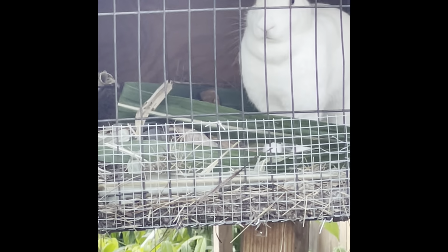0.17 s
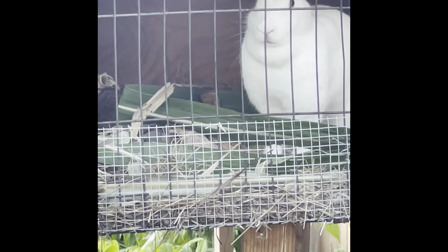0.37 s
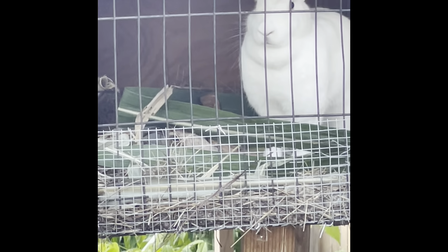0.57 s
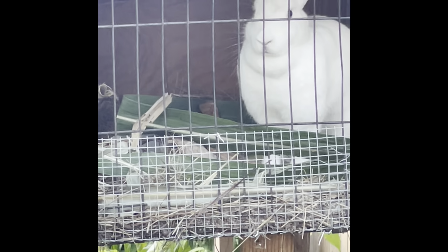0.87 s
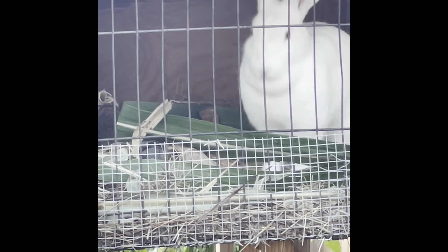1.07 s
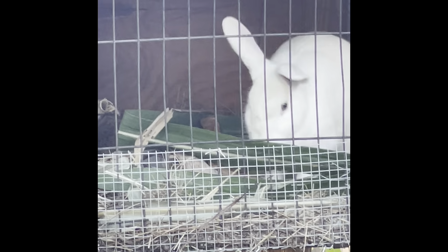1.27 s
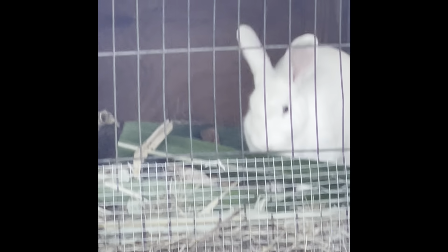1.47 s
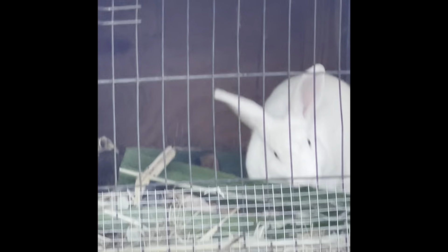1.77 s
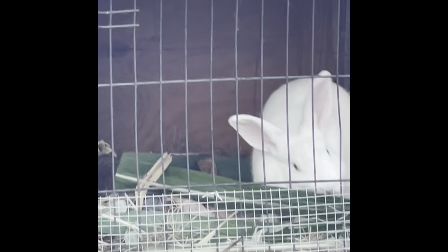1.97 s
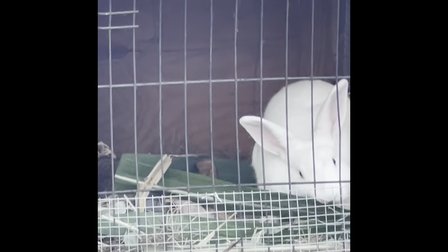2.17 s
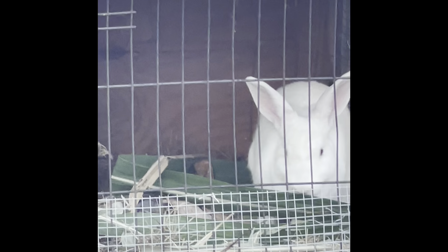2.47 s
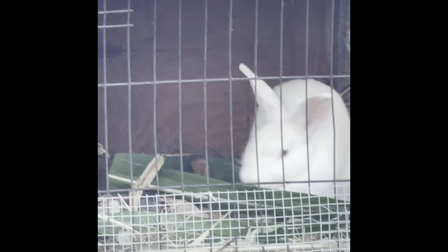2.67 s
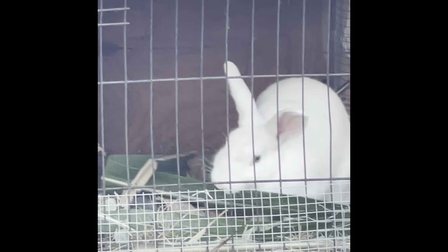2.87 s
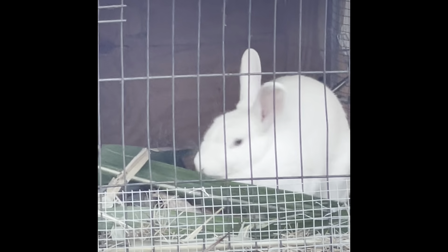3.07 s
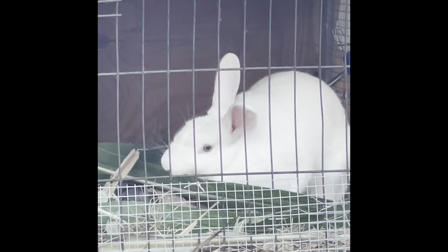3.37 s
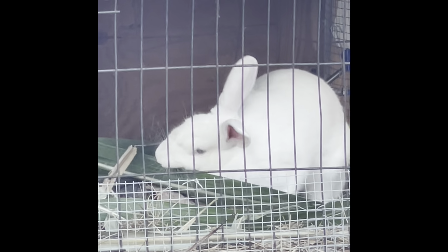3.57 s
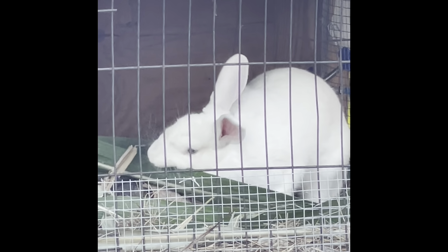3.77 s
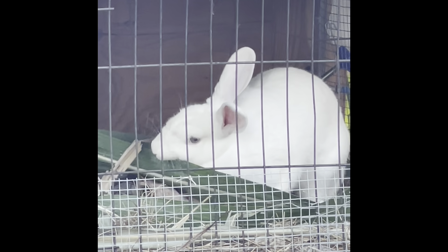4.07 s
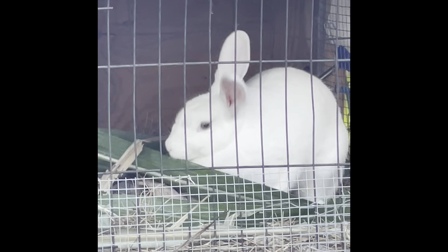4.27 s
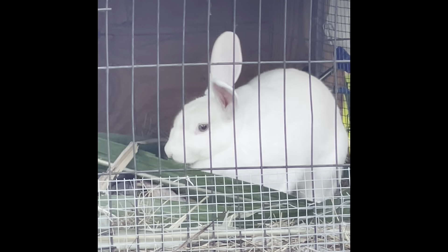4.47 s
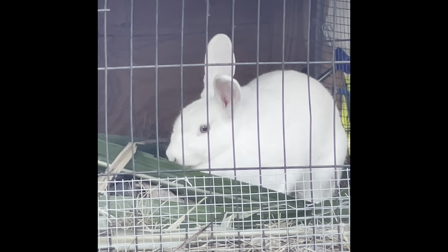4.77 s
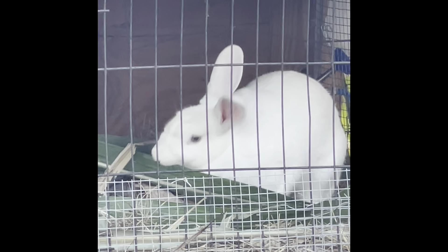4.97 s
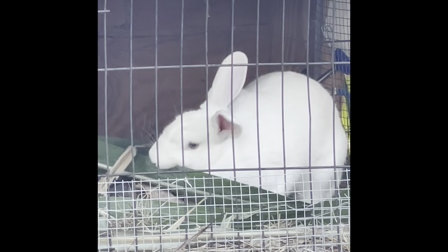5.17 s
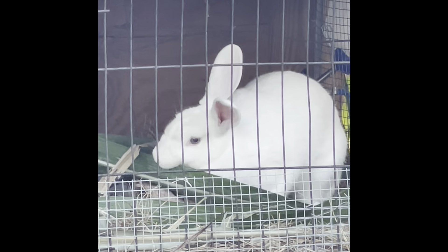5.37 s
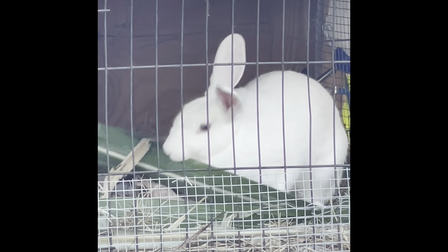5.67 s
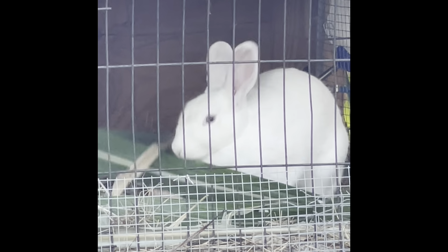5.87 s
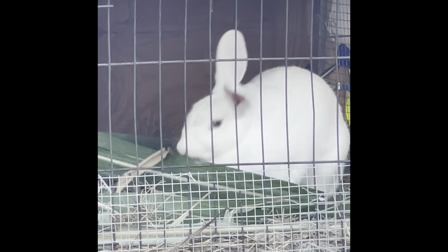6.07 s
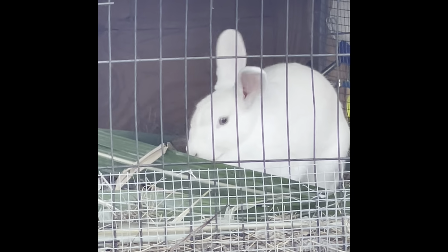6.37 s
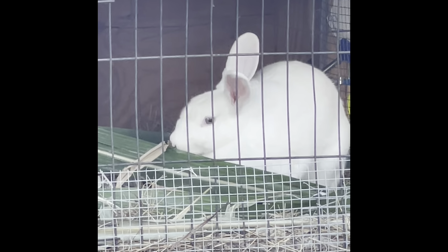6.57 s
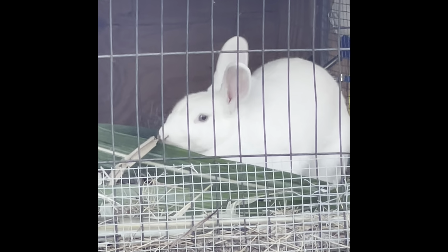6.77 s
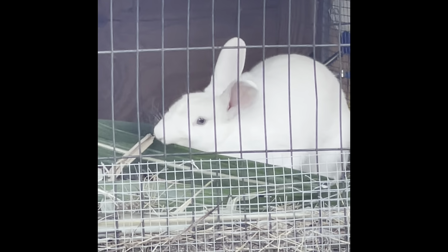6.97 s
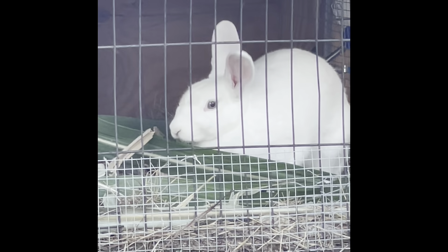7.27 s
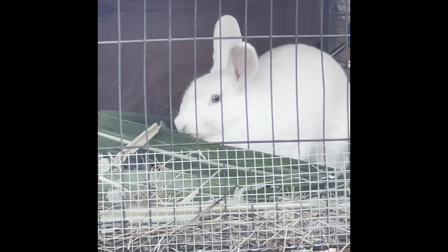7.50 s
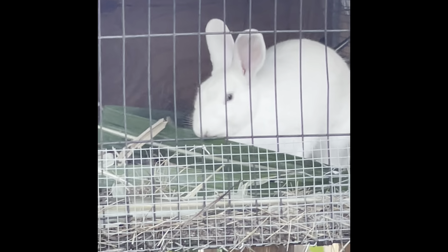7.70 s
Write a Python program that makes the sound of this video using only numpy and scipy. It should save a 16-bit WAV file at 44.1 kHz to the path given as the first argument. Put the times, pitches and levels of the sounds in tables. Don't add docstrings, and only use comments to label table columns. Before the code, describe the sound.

A nearby jay gives four harsh, rasping screams outdoors over low distant traffic rumble and faint insect hiss, with small ticks of straw and wire.

```python
import sys
import numpy as np
from scipy import signal
from scipy.fft import rfft, irfft, next_fast_len
from scipy.io import wavfile
from scipy.ndimage import map_coordinates

SR = 44100
rng = np.random.default_rng(int(sys.argv[2]) if len(sys.argv) > 2 else 0)


def to_linear_factor(level_db):
    exponent = np.asarray(level_db, float) / 20
    return 10 ** exponent


def waveform_to_disk(signal):
    frames = np.transpose(np.atleast_2d(signal))
    scaled = np.clip(frames, -1, 1) * 32767
    samples = np.round(scaled).astype(np.int16)
    wavfile.write(sys.argv[1], SR, samples)


N = 376525

# time in seconds, traffic density in dB.
TRAFFIC_DENSITY = [
    (0.0, -60),
    (0.45, -61),
    (1.76, -63),
    (2.26, -62.5),
    (2.54, -62.5),
    (4.02, -64),
    (4.66, -63),
    (6.06, -65),
    (8.54, -65),
]
# mean level in dB, share of the density swing, gusts in dB.
ROAD_LAYERS = [
    (-40, 0.1, 0.55),
    (-49, 0.52, 0.66),
    (-62, 0.91, 0.56),
]
# frequency in Hz, level in dB.
RUMBLE_COLOUR = [(12, -86), (25, -40), (33, -17), (39, 8), (48, -1), (70, 2), (113, -1.5), (145, 1.5),
                 (171, -6.5), (198, -3), (222, -8.5), (344, -17), (520, -45), (900, -120)]
ROAR_COLOUR = [(90, -90), (150, -29), (300, 1.5), (600, 1), (900, -2.5), (1200, -10.5), (1700, -73),
               (2600, -110)]
TYRE_HISS_COLOUR = [(400, -91), (700, -24), (1200, 0), (1700, -7.5), (2200, -15.5), (3000, -22.5),
                    (3500, -31), (6000, -33.5), (9500, -31), (11300, -27), (12000, -29), (13200, -40),
                    (14400, -49)]

# peak in Hz, fall below it in Hz per 10 dB, fall above it in Hz per 10 dB.
INSECT_BANDS = [
    (5170, 252, 168),
    (6707, 344, 148),
    (8583, 608, 255),
]
# time in seconds, level in dB.
LOW_CHORUS = [(0.0, -89), (0.45, -85), (0.83, -99), (1.09, -101), (1.21, -78), (1.95, -95), (2.64, -81),
              (3.14, -95), (3.3, -81.5), (4.35, -95), (4.9, -85), (6.01, -88), (6.25, -91), (7.99, -90),
              (8.08, -79), (8.54, -86)]

# start in seconds, length in seconds, start pitch in Hz, end pitch in Hz, level in dB.
CHIPS = [(1.94, 0.055, 4120, 4070, -74), (2.19, 0.064, 4100, 4080, -75), (4.082, 0.032, 3950, 3800, -77),
         (4.255, .06, 4400, 4400, -82), (4.496, .04, 4500, 4450, -81), (6.89, .07, 3500, 3460, -84),
         (6.96, .03, 4100, 3940, -79), (7.028, 0.046, 3930, 3950, -80), (7.17, .09, 4500, 4500, -82),
         (7.413, 0.055, 4500, 4340, -80)]

# start in seconds, length in seconds, first pitch in Hz, last pitch in Hz, level in dB.
FAR_ANSWERS = [
    (2.03, .33, 859, 780, -80),
    (7.622, .25, 839, 800, -77.5),
]
# overtone number, level in dB.
FAR_OVERTONES = [(3, 2.5), (4, 5), (5, -12), (6, -16), (7, -8), (8, -21)]

# start in seconds, peak in dB, decay t60 in seconds, body over crisp part in dB.
WIRE_TICKS = [(1.73, -50, 0.12, -16), (2.66, -72, .055, -6), (2.76, -68, .06, 10), (3.75, -66, 0.045, -4),
              (3.818, -55.5, 0.075, 4), (3.86, -63, .06, 4), (3.934, -51.5, 0.11, 0.5),
              (4.29, -68, .05, -8), (5.755, -59, 0.057, 1), (6.02, -73, .05, -8), (6.55, -63, .05, -8),
              (6.846, -63, .05, -7), (7.159, -55, .05, -15), (8.315, -68.5, 0.19, 14), (8.35, -60, 0.14, 2),
              (8.401, -61, 0.12, 5), (8.459, -55, .22, 7), (8.509, -53, 0.18, -10)]
# start in seconds, peak in dB, rise in seconds, body over crisp part in dB.
STRAW_BRUSHES = [
    (2.872, -58.5, 0.012, 2),
    (4.46, -72, .02, 3),
    (5.62, -64.5, .01, 9),
    (5.68, -61.5, .0097, 7.5),
    (5.86, -64, 0.0082, 9),
    (8.175, -48, 0.032, 1),
    (8.24, -76, 0.056, 6),
    (8.499, -54.5, 0.006, 8),
]
# frequency in Hz, level in dB.
CRISP_COLOUR = [(2500, -40), (5000, -1), (7500, 0.5), (10500, 4.5), (12000, 1), (13500, -36), (15000, -50)]
BODY_COLOUR = [(500, -36), (1200, 9.5), (2500, 6.5), (4500, 0), (7000, -9), (10000, -42)]

# delay in seconds, strongest frequency in Hz, width in Hz, level in dB.
HEDGE_ECHO = (.12, 2950, 900, -15)
# frequency in Hz, t60 in seconds.
GARDEN_DECAY = [(1000, .4), (2000, 0.75), (3000, 0.77), (4500, 0.66), (7000, 0.47), (12000, 0.14)]

# clear note's start in seconds, its length in seconds, top pitch in Hz, level in dB,
# hoarseness from 0 to 1.
SCREAMS = [
    (1.089, 0.15, 1039, -52, 0.54),
    (3.16, 0.11, 1020, -53, 0.43),
    (5.263, .14, 1028, -52, .3),
    (7.954, 0.12, 982, -55.5, 0.44),
]
# stage, pitch in Hz, effort in dB, brightness in dB per octave.
SCREAM_ARCH = [
    (.3, 848, -3, -2),
    (.75, 864.4, 0.5, -18),
    (1, 983, -1.5, -1),
    (1.2, 1023, -5, 2.5),
    (1.58, 1006, -0.5, 1),
    (2, 976, -7.5, 8.5),
    (2.2, 867, -6, 6),
    (2.55, 743, -4.5, 0),
    (3, 714, -13.5, 0),
]
BILL_OPENING = [
    (0, 1),
    (.78, .9),
    (1.05, 0),
    (1.95, 0),
    (2.12, 1),
    (3, 1),
]
# overtone number, level in dB.
NEAR_OVERTONES = [(1, -24), (2, 3.5), (3, -1), (4, -4), (5, -8.5), (6, -9.5), (7, -12.5), (8, -20),
                  (9, -20), (10, -29.5), (11, -28), (12, -33)]
# frequency in Hz, level in dB.
THROAT_COLOUR = [(1200, -50), (2000, -40), (3000, 2), (3700, -22), (4300, 0.5), (5200, -6.5), (6500, -4),
                 (8000, -10), (11000, -19), (12500, -52)]

# frequency in Hz, left-right likeness from 0 to 1.
CHANNEL_LIKENESS = [(25, 0.98), (60, 1), (300, .99), (500, 0.95), (800, 0.55), (1150, 0.14), (1450, 0.77),
                    (1700, 0.99), (2000, 0.94), (9000, 0.99), (10500, 1), (12200, 0.77), (13700, .99),
                    (14300, .9)]
# frequency in Hz, radians by which the left channel leads.
CHANNEL_LEAD = [(300, 0), (800, .65), (1050, 0), (1300, -1), (1750, 0), (2700, .74), (4000, .8), (4550, 1.6),
                (5300, 5.4), (5750, 6.27), (6150, 6.42), (8850, 9.35), (9700, 9.7), (12000, 12.56)]


def unit(x):
    return x / np.sqrt(np.mean(x ** 2) + 1e-20)


def along(points, hz):
    f, v = np.transpose(points)
    return np.interp(np.log(hz + 1), np.log(f + 1), v)


def over_time(rows):
    return np.interp(np.arange(N) / SR, *np.transpose(rows))


def wobble(rate, size=N):
    knots = rng.standard_normal(int(size * rate / SR) + 4)
    return map_coordinates(knots, [np.arange(size) * rate / SR])


def filtered(x, response):
    m = next_fast_len(N + 8192)
    return irfft(rfft(x, m) * response(np.fft.rfftfreq(m, 1 / SR)), m)[..., :N]


def noise(gain, channels=1):
    return unit(filtered(rng.standard_normal((channels, N)), gain))


def coloured_noise(points, channels=1):
    return noise(lambda hz: to_linear_factor(along(points, hz)), channels)


def traffic():
    density_db = over_time(TRAFFIC_DENSITY)
    swing_db = density_db - density_db.mean()
    road = np.zeros((2, N))
    for (db, share, gust_db), colour in zip(ROAD_LAYERS, (RUMBLE_COLOUR, ROAR_COLOUR, TYRE_HISS_COLOUR)):
        level_db = db + share * swing_db + gust_db * wobble(5)
        road += to_linear_factor(level_db) * coloured_noise(colour, channels=2)
    return road


def insects():
    out = np.zeros(N)
    levels = [over_time(LOW_CHORUS) + 7]
    levels += [db + 2.1 * wobble(1.35) for db in (-76, -70.5)]
    warm_up_s = 1.8
    levels[-1] += -2 * np.exp(-(np.arange(N) / SR / warm_up_s) ** 2)
    for (peak_hz, below_hz, above_hz), db in zip(INSECT_BANDS, levels):
        def band(hz):
            away = np.where(hz < peak_hz, (peak_hz - hz) / below_hz, (hz - peak_hz) / above_hz)
            return to_linear_factor(-10 * np.abs(away) ** 1.8)
        out += to_linear_factor(db + 1.83 * wobble(7.4)) * noise(band)[0]
    return out


def small_birds():
    out = np.zeros(N)
    for s, length, start_hz, end_hz, db in CHIPS:
        n = round(length * SR)
        phase = 2 * np.pi * np.cumsum(np.linspace(start_hz, end_hz, n)) / SR
        level = to_linear_factor(db + 2.5 + 3 * wobble(60, size=n)) * np.hanning(n)
        out[round(s * SR):][:n] += level * np.sin(phase)
    return out


def voice(pitch_hz, overtones_db, rough, jitter, stutter, flutter_db, rasp_db):
    n = len(pitch_hz)
    unsteady = jitter * wobble(74.3, size=n) + stutter * rough ** 2 * wobble(160, size=n)
    phase = 2 * np.pi * np.cumsum(pitch_hz * (1 + unsteady)) / SR
    skip = 1 + 0.88 * rough * np.cos(phase / 2)
    out = np.zeros(n)
    for k, db in overtones_db.items():
        smear = wobble(450, size=n) * np.sin(k * phase) + wobble(450, size=n) * np.cos(k * phase)
        line = np.sqrt(2) * np.sin(k * phase + rng.uniform(0, 2 * np.pi)) * skip
        level = to_linear_factor(db + flutter_db * (1 + k / 12) * wobble(39.7, size=n))
        out += level * (np.sqrt(1 - rough) * line + to_linear_factor(rasp_db) * rough * smear)
    return out * signal.windows.tukey(n, .08)


def far_jay():
    attack_s, release_s, edge_db, sag = 0.019, .05, -9, 2.2
    out = np.zeros(N)
    for s, length, first_hz, last_hz, db in FAR_ANSWERS:
        t = np.arange(round(length * SR)) / SR
        pitch_hz = first_hz + (last_hz - first_hz) * (t / length) ** sag
        edge = np.clip(np.maximum(1 - t / attack_s, 1 - (length - t) / release_s), 0, 1)
        overtones = {round(k): db + edge_db * edge + d for k, d in FAR_OVERTONES}
        call = voice(pitch_hz, overtones, .3, jitter=.005, stutter=.09, flutter_db=3, rasp_db=3)
        out[round(s * SR):][:len(t)] = call
    return out


def straw_and_wire():
    tick_rise_s, brush_t60_s = 0.0016, 0.18
    linger = 2.8
    t, crisp, body = np.arange(N) / SR, np.zeros(N), np.zeros(N)
    contacts = [(s, db, tick_rise_s, t60, body_db) for s, db, t60, body_db in WIRE_TICKS]
    contacts += [(s, db, rise, brush_t60_s + linger * rise, body_db) for s, db, rise, body_db in STRAW_BRUSHES]
    for s, db, rise, t60, body_db in contacts:
        since = np.clip(t - s, 0, None)
        decay = to_linear_factor(db - 60 * np.clip(since - rise, 0, None) / t60)
        shape = decay * np.clip(since / rise, 0, 1)
        crisp += shape
        body += shape * to_linear_factor(body_db)
    grain = to_linear_factor(1.7 * wobble(600))
    return 0.38 * grain * (crisp * coloured_noise(CRISP_COLOUR)[0] + body * coloured_noise(BODY_COLOUR)[0])


def hedge_echo(x):
    delay, peak_hz, width_hz, db = HEDGE_ECHO
    blurred = x * wobble(140)
    return filtered(blurred, lambda hz: to_linear_factor(db) * np.exp(-((hz - peak_hz) / width_hz) ** 2 - 2j * np.pi * hz * delay))


def garden(x):
    hz, t, z = signal.stft(rng.standard_normal(SR), SR, nperseg=256)
    decay = to_linear_factor(-60 * t / along(GARDEN_DECAY, hz)[:, None])
    tail = signal.istft(z * decay, SR, nperseg=256)[1]
    blurred = x * wobble(260)
    return signal.fftconvolve(np.pad(blurred, (500, 0)), tail / np.linalg.norm(tail))[:N]


def bill_resonance(hz, bill_hz, width_hz):
    peak_db = -10 * ((hz - bill_hz) / width_hz) ** 2
    beside_db = -16 - 10 * np.log2(hz / bill_hz).clip(0)
    return np.maximum(peak_db, beside_db)


def near_jay():
    rise_s, breath_s = .05, .232
    edge_s, edge_db = .02, -20
    hoarse_db = -52.5
    clear_rough, end_rough = .08, .04
    rest_hz, slack_hz = 950, 260
    open_in_hz, open_out_hz = 3800, 3050
    wide_hz, narrow_hz = 1000, 700
    out, rasp, closing = np.zeros((3, N))
    at, *shape = np.transpose(SCREAM_ARCH)
    for s, length, top_hz, db, hoarse in SCREAMS:
        span = slice(round((s - rise_s) * SR), round((s + breath_s) * SR))
        t = np.arange(N)[span] / SR - s
        stage = 1 + np.clip(t, None, 0) / rise_s + np.clip(t, 0, length) / length
        stage += np.clip(t - length, 0, None) / (breath_s - length)
        arch_hz, effort, bright = [np.interp(stage, at, column) for column in shape]
        gape = np.interp(stage, *np.transpose(BILL_OPENING))
        late = t > length / 2

        effort += db + gape * (hoarse_db - db)
        effort += edge_db * np.clip(1 - np.minimum(t - t[0], t[-1] - t) / edge_s, 0, 1)
        open_rough = np.clip(hoarse + end_rough * late * (3 - stage), 0, .9)
        rough = clear_rough + gape * (open_rough - clear_rough)

        stretch = (top_hz - arch_hz.max()) / (arch_hz.max() - rest_hz)
        pitch_hz = arch_hz + np.clip(arch_hz - rest_hz, 0, None) * stretch
        pitch_hz = pitch_hz + slack_hz * (.47 - rough) * gape * ~late
        bill_hz = np.where(late, open_out_hz, open_in_hz)
        width_hz = np.where(late, narrow_hz, wide_hz)

        thin = 0.61 * max(hoarse_db - db, 0)
        overtones = {}
        for k, level in NEAR_OVERTONES:
            k = round(k)
            shut_db = level + bright * np.log2(k / 3) - thin * abs(np.log2(k / 3.4))
            open_db = bill_resonance(k * pitch_hz, bill_hz, width_hz)
            overtones[k] = effort + (1 - gape) * shut_db + gape * open_db
        out[span] = voice(pitch_hz, overtones, rough, jitter=.002, stutter=.09, flutter_db=2.4, rasp_db=1.5)
        rasp[span] = 2 * rough * to_linear_factor(effort - 7.5 - 14 * (0.5 - gape))
        closing[span] = late
    sputter = rasp * to_linear_factor(1.5 * wobble(250))
    breath = coloured_noise(THROAT_COLOUR)[0]
    focused = noise(lambda hz: np.exp(-((hz - open_out_hz) / narrow_hz) ** 2))[0]
    return out + sputter * (breath * to_linear_factor(-2.5 * closing) + closing * 0.48 * focused)


def spread_channels(shared, apart):
    sign = np.array([[1], [-1]])

    def turn(hz):
        return np.arccos(np.clip(along(CHANNEL_LIKENESS, hz), 0, 1)) / 2

    def half_lead(hz):
        return np.exp(.5j * np.interp(hz, *np.transpose(CHANNEL_LEAD)) * sign)

    common = filtered(shared, lambda hz: half_lead(hz) * np.cos(turn(hz)))
    return common + filtered(apart, lambda hz: half_lead(hz) * np.sin(turn(hz)) * sign)


def scene():
    road = traffic()
    far = far_jay() + small_birds()
    near = near_jay()
    birds = to_linear_factor(3.0) * near + to_linear_factor(0.5) * far
    birds = birds + hedge_echo(near) + garden(to_linear_factor(-9) * near + to_linear_factor(-2.5) * far)
    return spread_channels(road[0] + birds + straw_and_wire() + insects(), road[1])


def band_limit(x):
    return signal.sosfilt(signal.butter(12, 14320, fs=SR, output="sos"), x)


def record(dry):
    mix = dry * to_linear_factor([[.12], [-.12]])
    return band_limit(mix)


dry = scene()
out = record(dry)
waveform_to_disk(out)
```